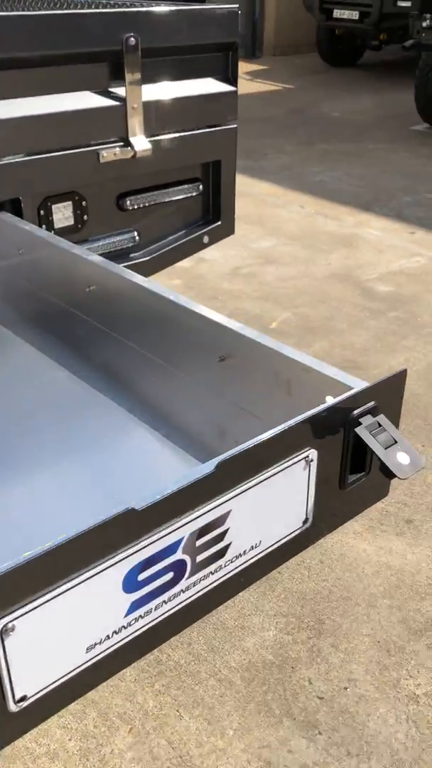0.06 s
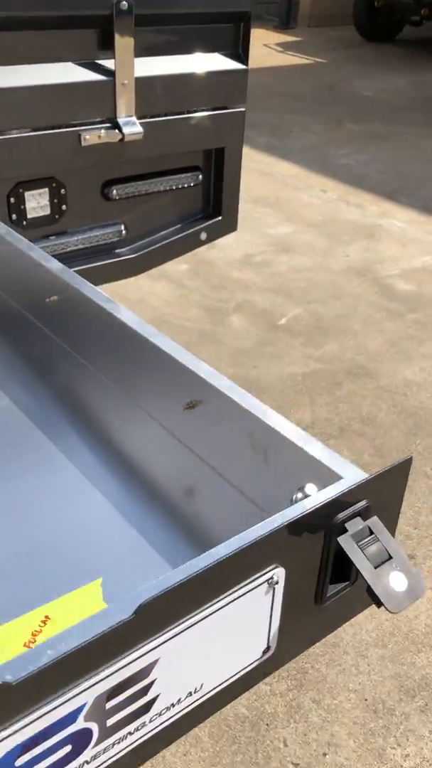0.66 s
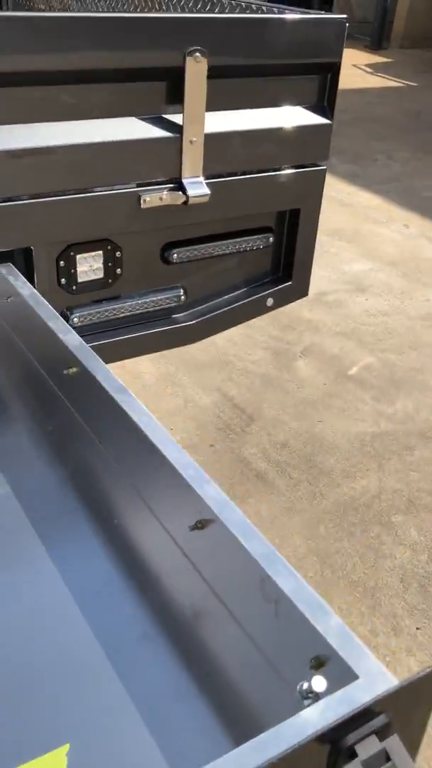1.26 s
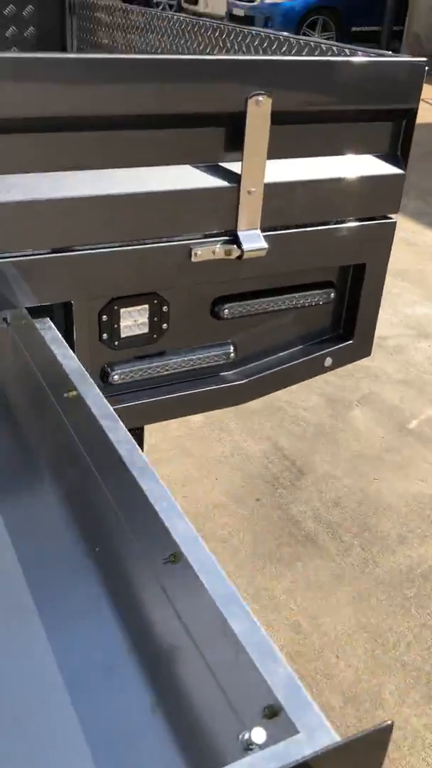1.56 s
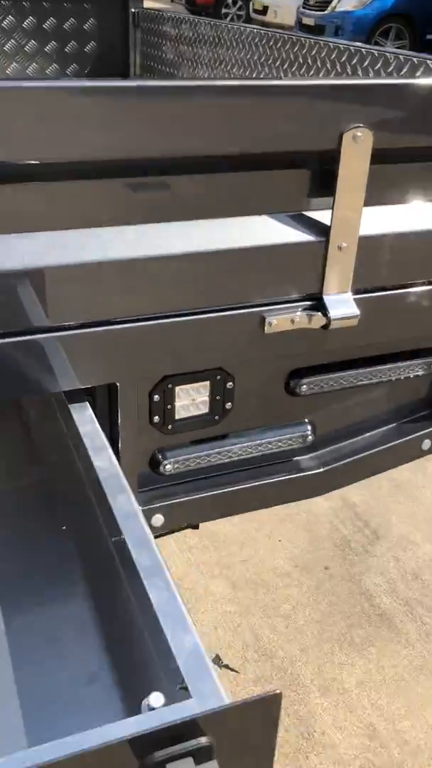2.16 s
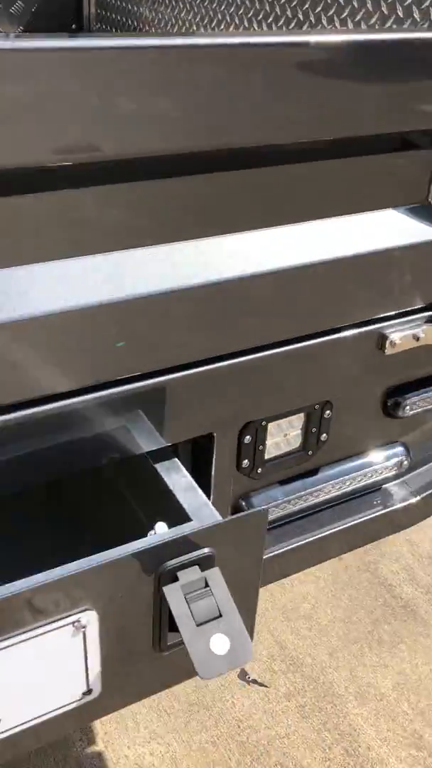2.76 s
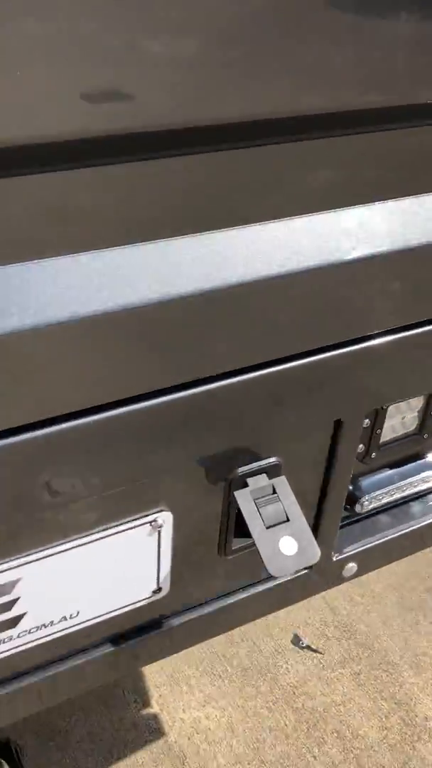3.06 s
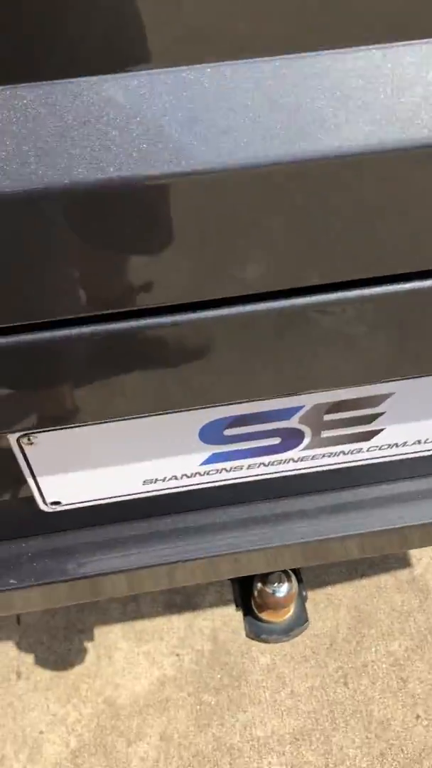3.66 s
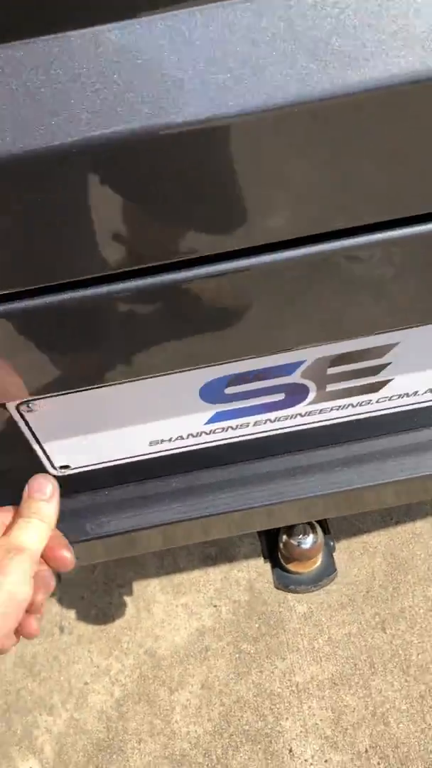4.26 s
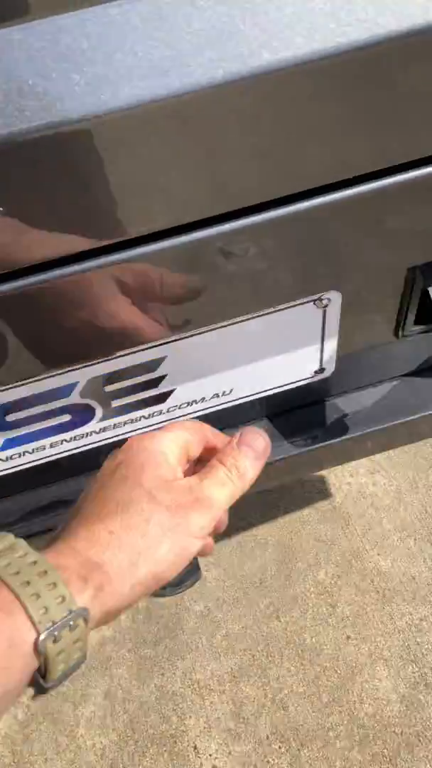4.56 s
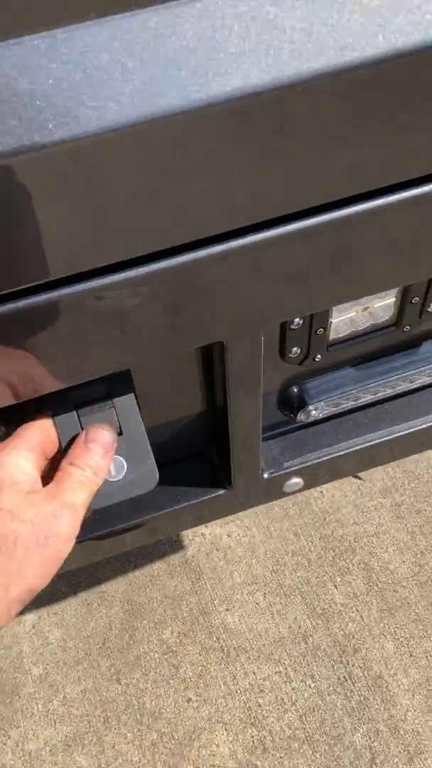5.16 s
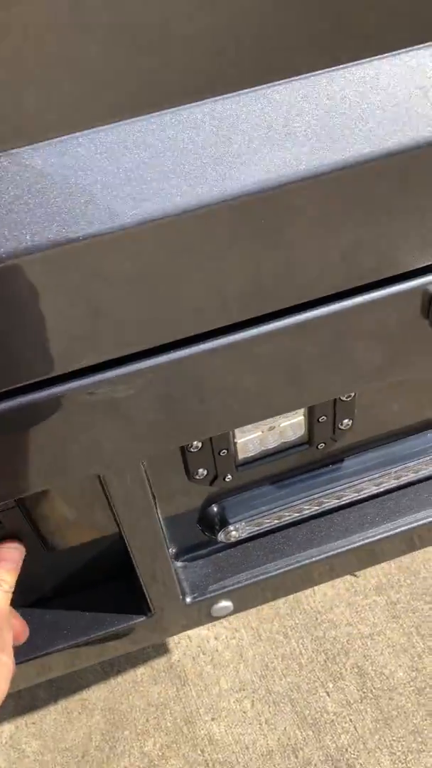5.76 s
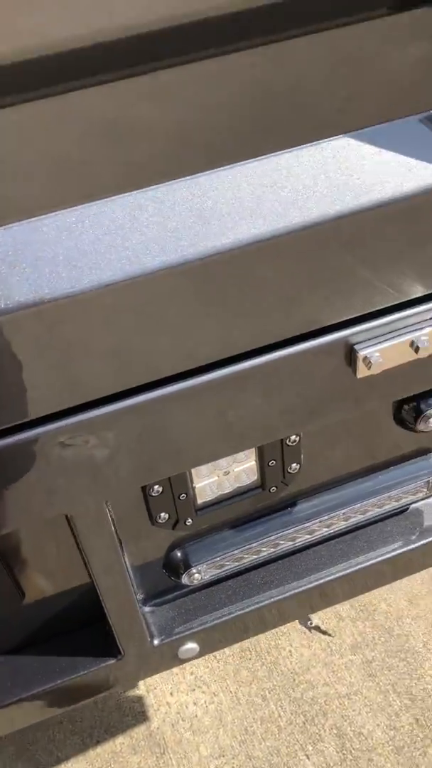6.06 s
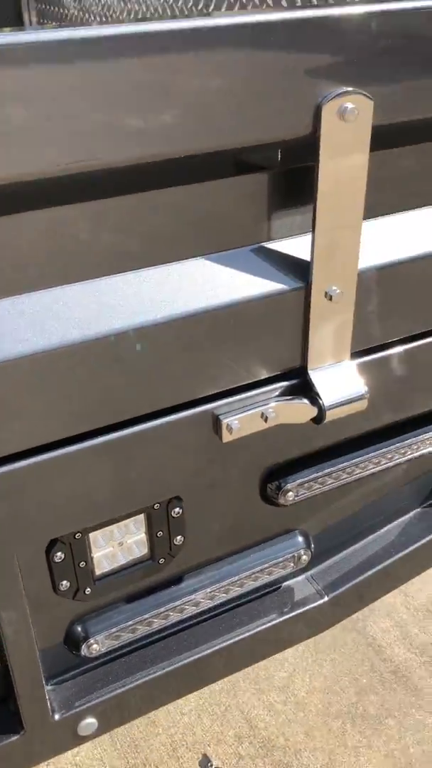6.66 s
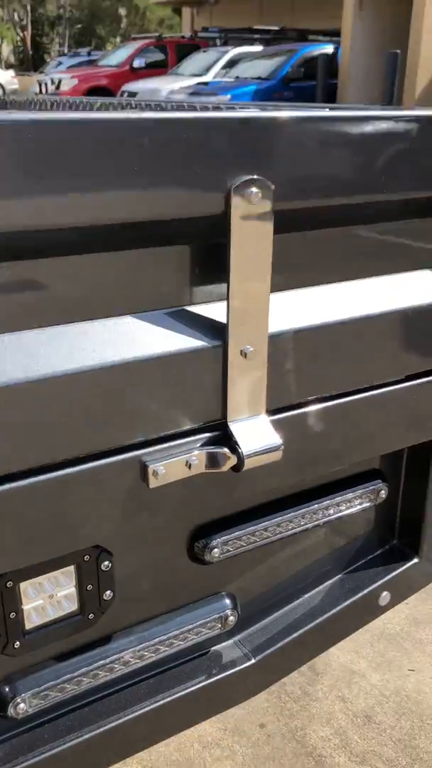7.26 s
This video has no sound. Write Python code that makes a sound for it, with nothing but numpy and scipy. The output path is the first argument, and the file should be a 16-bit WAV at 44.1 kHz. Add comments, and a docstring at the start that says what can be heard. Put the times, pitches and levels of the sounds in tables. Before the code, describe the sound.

Close to the microphone in an open yard, a large metal drawer rolls shut, its rumble growing until the runners catch with a boom. It slows and hits home with a ringing clunk. One steel latch snaps closed, then a second about two seconds later, with a little creaking around it. Distant traffic and an idling engine hum quietly throughout, with faint high bird calls and the occasional scuff of shoes on concrete.

```python
"""An open yard, microphone close to a truck; traffic, an idling engine and thin bird squeals far off.
A heavy steel drawer rolls shut on ball-bearing runners, catches halfway with a boom of its box, then
bumps the stop and rings the tray. Two paddle latches are snapped shut in turn, steel on steel, and the
second creaks as its pivot sticks and slips. Shoes scuff the concrete; the walls give faint echoes."""
import sys
import numpy as np
from scipy import signal
from scipy.fft import rfft, irfft, next_fast_len
from scipy.io import wavfile
from scipy.ndimage import uniform_filter1d

SR = 44100
rng = np.random.default_rng(int(sys.argv[2]) if len(sys.argv) > 2 else 0)


def dump_mix(stems):
    """Bounce the given channels to the path in sys.argv[1] as a 16-bit WAV at rate SR."""
    frames = np.atleast_2d(stems).T  # one column per channel
    limited = np.clip(frames, -1, 1)  # hard clip at full scale
    pcm = np.round(limited * 32767).astype(np.int16)
    wavfile.write(sys.argv[1], SR, pcm)


N = 330819
TIME = np.arange(N) / SR
TAPS = 4096
HZ = np.fft.rfftfreq(TAPS, 1 / SR)

# reverberation between truck and walls: (frequency [Hz], t60 [s])
YARD_DECAY = [(200, .45), (1000, .31), (4000, .24), (9000, .2), (15000, .18)]
# arrivals of that tail at the microphone: (delay [s], level [dB])
YARD_ECHOES = [(.004, 0), (.062, -20), (.105, -20.5)]
# colour of the yard's tail and of the far traffic: (frequency [Hz], relative level [dB])
YARD_SPECTRUM = [(100, 2.5), (400, 8.5), (1200, -2.5), (2500, -0.5), (6500, -5), (10000, -5), (15000, -6.5)]
TRAFFIC_SPECTRUM = [(15, -43.5), (25, -14), (66, -1.5), (117, -4), (175, -8), (212, -7.5), (263, -14.5),
                    (301, -13.5), (326, -20), (545, -25.5), (695, -26), (1520, -30.5), (4870, -44),
                    (14800, -56), (16000, -56.5)]
# hum of an idling engine: (frequency [Hz], relative level [dB])
ENGINE_PARTIALS = [(80, -1.5), (116, 0.5), (149, -4), (300, -16.5)]
# the hum swells and sinks back: (peak time [s], level [dB])
ENGINE_SWELLS = [(5.4, -46.5), (6.9, -50.5)]
# birds beyond the yard: (start [s], length [s], first pitch [Hz], top pitch [Hz], last pitch [Hz],
# place of the top [0-1], level [dB], rasp [0-1])
BIRD_CALLS = [(0.333, 0.38, 4680, 5120, 5100, 0.65, -68, 0.5),
              (0.644, 0.25, 5080, 5520, 4700, 0.3, -63.5, 0.57),
              (3.173, 0.12, 4900, 5000, 4900, 0.3, -72, 0.4),
              (3.429, .29, 4740, 5200, 4650, 0.62, -62.5, 1),
              (4.214, 0.39, 4880, 5080, 5000, 0.32, -71, 0.9),
              (4.9, 0.47, 4850, 5000, 4790, 0.5, -60, 0.79),
              (5.081, 0.083, 5080, 5240, 5280, .85, -65, 0.1), (5.172, .1, 5250, 6050, 5900, 0.6, -65, 0.1),
              (5.305, 0.1, 5160, 5280, 4300, .12, -65.5, 0.3),
              (7.032, 0.11, 4550, 5080, 4600, 0.56, -66, 0.1),
              (7.18, 0.069, 4700, 4720, 4350, .15, -67, .1)]
# shoes on concrete: (start [s], length [s], level [dB])
SHOE_SCUFFS = [(0.587, 0.082, -63), (.92, 0.1, -66), (3.693, .07, -66), (5.246, .09, -61.5),
               (6.198, 0.19, -65.5), (6.43, 0.18, -69)]
# colour of grit under a sole and of a tiny slip of steel: (frequency [Hz], relative level [dB])
GRIT_SPECTRUM = [(800, -12), (2800, -8), (4200, 1), (7000, 0), (10000, -8), (15500, -7)]
TICK_SPECTRUM = [(500, -23), (1500, -2), (4800, 6), (8500, -6.5), (11000, -11), (16000, -15)]
# lone ticks of settling steel: (time [s], level [dB], brightness [dB/octave])
SETTLING_TICKS = [(2.91, -54, 11), (3.425, -52, 11), (6.7184, -54.5, -5), (7.2148, -49, -9)]
# slips in the latch pivot: (start [s], end [s], first gap [s], gap growth [ratio], level [dB])
PIVOT_CREAKS = [(5.36, 5.55, 0.014, 1.105, -59.5), (5.874, 6.01, .006, 1.47, -56)]
# the stop and each latch: (frequency [Hz], nominal width [Hz], relative level [dB])
STOP_RESONANCES = [(1030, 480, -0.5), (1240, 330, 3.5), (2750, 1150, -11), (5060, 1700, -12.5),
                   (8850, 2000, -29)]
RIGHT_LATCH_RESONANCES = [(666, 350, -12.5), (1244, 240, 1), (1980, 200, -11), (2490, 200, -5),
                          (2840, 220, -4.5), (3750, 380, -7.5), (4770, 220, -5), (5204, 390, -9.5),
                          (6265, 520, -1), (7090, 240, -0.5), (7540, 200, -2), (8040, 230, -2),
                          (9280, 680, -2.5), (9850, 220, -6.5), (11200, 530, -14.5), (12600, 170, -0.5),
                          (13300, 250, -7), (14250, 546, -8.5), (15060, 150, -1.5)]
LEFT_LATCH_RESONANCES = [(374, 270, -11), (700, 350, -10), (1228, 194, 1.5), (1850, 200, -12),
                         (2480, 250, -8.5), (2830, 200, -10), (3270, 240, -5), (3870, 350, -10.5),
                         (4420, 200, -4.5), (4960, 450, -5.5), (5810, 270, -2.5), (6360, 380, -1.5),
                         (6700, 244, -2.5), (7200, 190, -0.5), (7800, 240, -1), (8900, 240, -5),
                         (10100, 240, -11.5), (11100, 590, -15), (12060, 300, -11), (13200, 250, -13),
                         (14000, 350, -8), (14300, 300, -8.5)]
# hard contacts on those parts; a latch touches, slips and snaps home:
# (time [s], level [dB], chatter length [s], brightness [dB/octave], tuning of the resonances [ratio])
STOP_CONTACTS = [(3.3245, -42, 0.0094, 1, 0.96), (3.339, -20, 0.0017, -1, 0.98),
                 (3.3476, -34, 0.0019, 2, 0.91)]
RIGHT_LATCH_CONTACTS = [(3.8243, -31.5, 0.0038, -2, 0.9), (3.8487, -26.5, 0.008, -3.5, 0.94),
                        (3.935, -48, .006, 1, 1), (3.9581, -10.5, .0056, 1, 1)]
LEFT_LATCH_CONTACTS = [(5.6337, -26, 0.0077, -1, 0.99), (5.6632, -28, 0.0051, -2.5, .97),
                       (5.7092, -11, 0.0044, 0.53, 1.005)]
# the drawer is pushed up to the catch and coasts home: (time [s], relative speed [ratio])
DRAWER_SPEED = [(1.17, 0.15), (1.5, 0.69), (1.85, 0.62), (2.25, 0.8), (2.43, 1.03), (2.75, .97), (3.0, 0.7),
                (3.33, 0.23)]
# colour of the two stages of the telescopic runners: (frequency [Hz], relative level [dB])
OUTER_STAGE_SPECTRUM = [(60, -31), (130, -17), (185, 3.5), (250, -2.5), (400, -6), (600, -14.5),
                        (1000, -15.5), (2200, -20), (3500, -30), (6000, -37), (10000, -50), (15000, -47.5)]
INNER_STAGE_SPECTRUM = [(60, -6), (130, -1), (220, 2), (300, -3.5), (420, -5.5), (600, -18), (1000, -19),
                        (2200, -20), (3500, -30.5), (6000, -36.5), (10000, -37), (15000, -36)]
# rails under the rollers: (frequency [Hz], t60 [s], relative level [dB], power of speed [exponent])
RAIL_MODES = [(186, 0.17, -43.5, 0.93), (300, 0.13, -47, 0.85), (396.5, 0.17, -46, 1.1),
              (490, 0.16, -45.5, 3.8), (546, 0.2, -45, 6.7), (618, 0.18, -50, 5.6), (742, 0.093, -57, 1.3)]
# ringing of a rail struck at its joint, the thin drawer front, the drawer box and the tray around it:
# (frequency [Hz], relative level [dB], t60 [s])
PING_MODES = [(3150, -1, .06), (4430, -6, .06), (4970, -7, .08), (5780, 2, 0.057), (7050, -12, .07)]
FRONT_MODES = [(780, -4, .1), (956, -6, 0.15), (1116, 3, .09), (1193, -7.5, 0.18), (1316, -3.5, 0.13),
               (1700, -9, 0.17), (2510, -6.5, 0.176), (2910, -5.5, .1), (3270, -12, 0.22),
               (4200, -10.5, 0.2), (4450, -7.5, .14), (5250, -9.5, .14), (6500, -11, .14),
               (7307, -10, 0.0958), (9100, -15, 0.1196), (12650, -18, .06)]
BOX_MODES = [(74.3, -15.5, 0.79), (115.2, -17, 0.87), (157.6, -1, 0.24), (170.7, 5, 0.27),
             (188.4, -3, 0.34), (245.6, -7, 0.56), (347, -21, 0.6), (415, -24, 0.32), (560, -23, 0.29),
             (757, -18, 0.26), (815, -19, 0.21)]
TRAY_MODES = [(52.5, -3, 0.48), (77, 4.5, 0.2), (160, -8, 0.44), (205.8, -6.5, 0.37), (253, -2, 0.49),
              (343.5, -13, 0.31), (434, -5, 0.16), (592, -21, 0.2), (1012, -25, 0.2), (1140, -26, .25),
              (1240, -29, 0.19)]
# dense ringing of sheet panels and of loose runner steel: (frequency [Hz], relative level [dB])
THUD_SPECTRUM = [(40, -31.5), (90, -1.5), (200, 6), (330, -2), (430, 0), (620, -8), (800, -8),
                 (1100, -22.5), (2500, -27.5), (8000, -38)]
CLATTER_SPECTRUM = [(200, 5), (700, -1), (1250, -1.5), (1700, -1), (2700, -6), (4000, -10), (6500, -11),
                    (10000, -20.5), (14500, -21), (16000, -44)]
# the runners catch, then the drawer bumps the tray:
# (time [s], boom level [dB], weight as extra bass [dB], clatter level [dB])
RUNNER_CATCHES = [(2.4372, -17, -4, -24.5), (2.4548, -23.5, 5, -29.5), (2.4897, -28, 6, -26),
                  (2.501, -22, 13, -35), (2.571, -32, 10, -58), (2.695, -32, -6, -51)]
TRAY_BUMPS = [(3.1419, -47.5, 4.5, -41.5), (3.3233, -29.5, -0.5, -35), (3.339, -34.5, -0.5, -32),
              (3.361, -27, -10.5, -58), (3.401, -47.5, 5.5, -49), (3.424, -57, -0.5, -54)]


def amp(db):
    """Decibels to gain."""
    return 10 ** (np.asarray(db) / 20)


def unit(x):
    """Scales to rms 1."""
    return x / np.sqrt(np.mean(x ** 2) + 1e-20)


def read(points, hz=HZ):
    """Reads a spectrum on a log-frequency axis."""
    f, value = np.transpose(points)
    return np.interp(np.log(hz + 1), np.log(f + 1), value)


def tilt(db_per_octave):
    """Gain in dB at each of HZ, sloping above 500 Hz."""
    return db_per_octave * np.log2(np.maximum(HZ, 500) / 500)


def add(mix, s, sound):
    """Mixes a sound in at time s."""
    part = mix[round(s * SR):][:len(sound)]
    part += sound[:len(part)]


def colour(x, db):
    """Causal filter with the given gain in dB at each of HZ."""
    log_gain = np.log(amp(np.r_[db, db[-2:0:-1]]))
    response = np.fft.ifft(np.exp(np.conj(signal.hilbert(log_gain)))).real
    return signal.oaconvolve(x, response[:TAPS * 3 // 4])[:len(x)]


def band_noise(samples, lo_hz, hi_hz):
    """One band of noise at rms 1."""
    bandpass = signal.butter(2, [lo_hz, hi_hz], "band", fs=SR, output="sos")
    return unit(signal.sosfilt(bandpass, rng.standard_normal(samples)))


def drift(rate_hz):
    """Slow random motion of rms 1."""
    size = next_fast_len(N, real=True)
    smoothing = np.exp(-(np.fft.rfftfreq(size, 1 / SR) / rate_hz) ** 2)
    return unit(irfft(rfft(rng.standard_normal(size)) * smoothing, size)[:N])


def clumpy_noise(depth_db, clump_samples):
    """Half a second of noise whose level flickers."""
    flicker = unit(uniform_filter1d(rng.standard_normal(SR // 2), size=clump_samples))
    return amp(depth_db * flicker) * rng.standard_normal(SR // 2)


def strike(x, seconds):
    """Scales a blow to the energy of a unit sound lasting so many seconds."""
    return x / np.sqrt(np.sum(x ** 2) / (seconds * SR))


def yard(x):
    """A short, uneven tail, treble dying first, repeated faintly by the walls."""
    hz, t, bands = signal.stft(clumpy_noise(depth_db=2.2, clump_samples=180), SR, nperseg=256)
    decay = amp(-60 * t / read(YARD_DECAY, hz)[:, None])
    tail = signal.istft(bands * decay, SR, nperseg=256)[1]
    response = np.zeros(SR)
    for delay, db in YARD_ECHOES:
        add(response, delay, amp(db) * tail / np.linalg.norm(tail))
    return colour(signal.oaconvolve(x, response)[:N], read(YARD_SPECTRUM))


def traffic(rumble_db=-48, wash_db=-44):
    """Far-off traffic reaches the yard as a lumpy rumble under a smooth wash."""
    wash = unit(colour(rng.standard_normal(N), read(TRAFFIC_SPECTRUM)))
    low = signal.sosfiltfilt(signal.butter(2, 260, fs=SR, output="sos"), wash)
    return low * amp(rumble_db + 2.6 * drift(rate_hz=3.2)) + amp(wash_db) * (wash - low)


def engine(idle_db=-57.5, rise_s=0.077, fall_s=0.49):
    """An engine idles in the distance; its hum wavers and swells."""
    hum, level = np.zeros(N), amp(idle_db)
    for hz, db in ENGINE_PARTIALS:
        gain = amp(db + 3 * drift(rate_hz=4.4))
        pitch = hz * (1 + 0.012 * drift(rate_hz=8))
        hum += gain * np.sin(2 * np.pi * np.cumsum(pitch) / SR)
    for s, db in ENGINE_SWELLS:
        level = level + amp(db) * np.exp(-np.maximum((s - TIME) / rise_s, (TIME - s) / fall_s))
    return unit(hum) * level


def squeal(length, first_hz, top_hz, last_hz, top_at, top_db, top_rasp):
    """A bird's two whistling voices; pitch, level and rasp follow one arch."""
    t = np.arange(0, length, 1 / SR)
    skew = np.log(0.5) / np.log(np.clip(top_at, 0.1, 0.9))
    arch = np.sin(np.pi * (t / length) ** skew)
    end_hz = np.where(t < top_at * length, first_hz, last_hz)
    hz = end_hz + (top_hz - end_hz) * arch ** 0.71  # holds near the top, drops at the ends
    # rasp shakes the pitch and brings out the upper voice and the overtones
    rasp = top_rasp * (0.55 + 0.45 * arch)
    voices = np.zeros(len(t))
    for ratio, gain in ((1, 1), (1.19, amp(-9) * np.sqrt(abs(rasp)))):
        jitter = 0.074 * rasp * band_noise(len(t), 29.2, 450)
        flutter = amp(2.9 * band_noise(len(t), 14, 150))
        phase = 2 * np.pi * np.cumsum(hz * ratio * (1 + jitter)) / SR
        overtones = amp(-10) * (0.3 + rasp) * (np.sin(2 * phase) + 0.55 * rasp * np.sin(3 * phase))
        voices += gain * flutter * (np.sin(phase) + overtones)
    hiss = 0.63 * top_rasp ** 2 * (0.55 + 0.45 * arch) ** 2 * band_noise(len(t), 7100, 16500)
    envelope = amp(top_db - 6 * (1 - arch)) * signal.windows.tukey(len(t), 0.1)
    return envelope * (unit(voices) + hiss)


def birds():
    """Thin squeals carry from the trees beyond the yard."""
    out = np.zeros(N)
    for start, *call in BIRD_CALLS:
        add(out, start, squeal(*call))
    return out + amp(-8.5) * yard(out)


def scuffs(grit_db=3):
    """Grit grinds under a sole in short swells."""
    grit = amp(grit_db * drift(rate_hz=250)) * rng.standard_normal(N)
    envelope = np.zeros(N)
    for s, length, db in SHOE_SCUFFS:
        add(envelope, s, amp(db) * signal.windows.tukey(round(length * SR), 0.7))
    return envelope * unit(colour(grit, read(GRIT_SPECTRUM)))


def chatter(seconds, first_touch=0.45):
    """Metal meets metal and chatters for a few ms: a short burst with a hard front."""
    t = TIME[:TAPS]
    window = np.exp(-(t / seconds) ** 4)
    burst = rng.standard_normal(TAPS)
    burst[0] = first_touch * np.sqrt(seconds * SR)
    for _ in range(8):  # evens out the spectrum while keeping the burst short
        burst = irfft(np.exp(1j * np.angle(rfft(burst * window))))
    return burst * np.exp(-t / (2.5 * seconds))


def tick(db, brightness_db):
    """One tiny slip of steel under load."""
    slip = colour(chatter(seconds=0.0042), read(TICK_SPECTRUM) + tilt(brightness_db))
    return amp(db) * strike(slip, seconds=0.0033)


def creaks(scatter_db=3.5):
    """Settling steel ticks, and the latch pivot sticks and slips ever more slowly."""
    out = np.zeros(N)
    for s, db, brightness_db in SETTLING_TICKS:
        add(out, s, tick(db, brightness_db))
    for start, end, first_gap, growth, db in PIVOT_CREAKS:
        gaps = first_gap * growth ** np.arange(16)
        times = start + np.cumsum(gaps) - gaps
        levels_db = db - scatter_db * rng.standard_normal(len(times))
        for s, slip_db in zip(times[times < end], levels_db):
            add(out, s, tick(slip_db, brightness_db=1.5))
    return out + amp(-3) * yard(out)


def ring(modes, build_cycles, bass_db=0):
    """Struck steel: each mode builds up and dies away; a heavy blow favours the lowest."""
    out = np.zeros(SR)
    for hz, db, t60 in modes:
        t = TIME[:min(round(t60 * SR), SR)]
        lowness = 1 / (1 + (hz / 135) ** 12)
        swell = 1 - np.exp(-t * hz / build_cycles)
        add(out, 0, amp(db + bass_db * lowness - 60 * t / t60) * swell * np.sin(2 * np.pi * hz * t))
    return out


def steel_part(resonances, crack_db, widen, tuning):
    """Gain in dB of a small steel part: peaks over a broadband crack, radiating little bass."""
    power = amp(crack_db) ** 2
    for hz, width, db in resonances:
        detuning = 1.75 * (HZ - hz * tuning) / (width * widen)
        power = power + amp(db) ** 2 / (1 + detuning ** 2) ** 2
    return 10 * np.log10(power / (1 + (330 / (HZ + 10)) ** 4))


def contacts(rows, resonances, crack_db, spread, front_db, wet_db):
    """Hard contacts ring a small part near the microphone; drawer front and yard ring on after it."""
    direct, scattered = np.zeros(N), np.zeros(N)
    front = ring(FRONT_MODES, build_cycles=0.88)
    for s, db, seconds, brightness_db, tuning in rows:
        burst, tilt_db = chatter(seconds), tilt(brightness_db)
        sharp = colour(burst, steel_part(resonances, crack_db, 0.75, tuning) + tilt_db)
        add(direct, s, amp(db) * strike(sharp, seconds=0.004))
        # duller contacts press longer and put more into the panel
        add(direct, s, amp(db + front_db - 2.6 * brightness_db) * colour(front, tilt_db))
        # summed over all directions, the peaks are blunter
        blunt = colour(burst, steel_part(resonances, crack_db, spread, tuning) + tilt_db)
        add(scattered, s, amp(db) * strike(blunt, seconds=0.0038))
    return direct + amp(wet_db) * yard(scattered)


def latch(rows, resonances, crack_db, spread, wet_db, bounce_s=0.0135):
    """A paddle latch snaps shut; each contact bounces once, weaker and brighter."""
    bounces = [(s + bounce_s, db - 31, seconds, brightness_db + 4.5, tuning)
               for s, db, seconds, brightness_db, tuning in rows]
    return contacts(list(rows) + bounces, resonances, crack_db, spread, front_db=-21, wet_db=wet_db)


def rails(speed, knocks_per_s=600):
    """Rollers knock over rough spots and ring the rails; some modes wake only near top speed."""
    out, t = np.zeros(N), TIME[:SR // 2]
    knocks = (rng.random(N) < knocks_per_s / SR) * rng.choice([-1, 1], N)
    for hz, t60, db, power in RAIL_MODES:
        mode = amp(-60 * t / t60) * np.cos(2 * np.pi * hz * t)
        out += amp(db) * unit(signal.oaconvolve(knocks, mode)[:N]) * speed ** power
    return out


def rolling(spectrum, start, stop, hiss_db, rails_db, grain_db, rumble_db=-37.5, ticks_per_s=1400):
    """Ball bearings tick over the rough track and shake the drawer, louder and brighter with speed."""
    speed = np.interp(TIME, *np.transpose(DRAWER_SPEED))
    hits = rng.random(N) < ticks_per_s / SR
    ticks = hits * amp(grain_db * np.minimum(rng.exponential(1, N), 4)) * rng.choice([-1, 1], N)
    shake = colour(unit(ticks) + 0.74 * rng.standard_normal(N), read(spectrum))
    low = signal.sosfiltfilt(signal.butter(3, 900, fs=SR, output="sos"), shake)
    rumble = amp(rumble_db) * unit(low) * speed ** 1.12
    hiss = amp(hiss_db) * unit(shake - low) * speed ** 2.4
    moving = np.clip((TIME - start) / 0.039, 0, 1) * np.clip((stop - TIME) / 0.012, 0, 1)
    return moving * (rumble + hiss + amp(rails_db) * rails(speed))


def runners(joint_s=1.641):
    """The outer stage rolls, pinging at a joint, until it catches; then the inner stage takes over."""
    outer = rolling(OUTER_STAGE_SPECTRUM, start=1.07, stop=2.47, hiss_db=-46, rails_db=-2, grain_db=1.5)
    inner = rolling(INNER_STAGE_SPECTRUM, start=2.45, stop=3.34, hiss_db=-49, rails_db=-4.5, grain_db=1)
    add(outer, joint_s, amp(-45.5) * ring(PING_MODES, build_cycles=6))
    add(outer, joint_s, tick(db=-43.5, brightness_db=-3))
    return outer + inner


def rattle(spectrum, t60, push, clump_db):
    """A first push, then many close modes dying together, in clumps where loose parts knock again."""
    modes = clumpy_noise(clump_db, clump_samples=110) * amp(-60 * TIME[:SR // 2] / t60)
    modes[0] = push * np.linalg.norm(modes)
    return strike(colour(modes, read(spectrum)), seconds=t60 / np.log(10 ** 6))


def blows(rows, modes, build_cycles, thud_db, thud_t60, push, clatter_t60):
    """Each blow booms in a steel box, thuds the panels by its weight and rattles runners and front."""
    out, front = np.zeros(N), ring(FRONT_MODES, build_cycles=1)
    for s, boom_db, weight_db, clatter_db in rows:
        thud = rattle(THUD_SPECTRUM, thud_t60, push, clump_db=1)
        clatter = rattle(CLATTER_SPECTRUM, clatter_t60, push=0.35, clump_db=2)
        add(out, s, amp(boom_db) * ring(modes, build_cycles, bass_db=weight_db))
        add(out, s, amp(boom_db + thud_db + 1.2 * weight_db) * thud)
        add(out, s, amp(clatter_db) * clatter)
        add(out, s, amp(clatter_db - 16.5) * front)
    return out


def scene():
    """One microphone in the open yard: drawer, stop and latches close by, the rest behind them."""
    catch = blows(RUNNER_CATCHES, BOX_MODES, build_cycles=1.56,
                  thud_db=-12, thud_t60=0.16, push=0.91, clatter_t60=0.21)
    bumps = blows(TRAY_BUMPS, TRAY_MODES, build_cycles=0.21,
                  thud_db=2, thud_t60=0.2, push=0.25, clatter_t60=0.1)
    stop = contacts(STOP_CONTACTS, STOP_RESONANCES, crack_db=-37, spread=0.91, front_db=-46, wet_db=-15.5)
    right = latch(RIGHT_LATCH_CONTACTS, RIGHT_LATCH_RESONANCES, crack_db=-14.5, spread=4.2, wet_db=-8.5)
    left = latch(LEFT_LATCH_CONTACTS, LEFT_LATCH_RESONANCES, crack_db=-18.5, spread=2.4, wet_db=-9.5)
    close = creaks() + runners() + catch + bumps + stop + right + left
    background = birds() + traffic() + engine() + scuffs()
    return (background + close)[None]


def record(dry, low_cut_hz=38, ceiling=0.8, edge_hz=16000):
    """The microphone drops deep bass and rounds the highest peaks; then the top treble is cut."""
    thin = signal.sosfilt(signal.butter(6, low_cut_hz, "high", fs=SR, output="sos"), dry)
    rounded = ceiling * np.tanh(thin / ceiling)
    lowpass = signal.firwin(255, edge_hz, window=("kaiser", 9), fs=SR)
    return signal.oaconvolve(rounded, lowpass[None], "same")


dry = scene()
out = record(dry)
dump_mix(out)
```